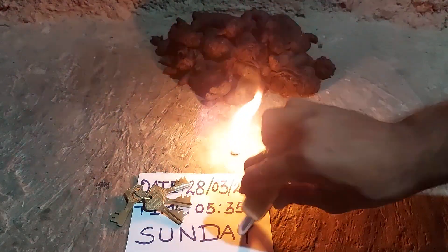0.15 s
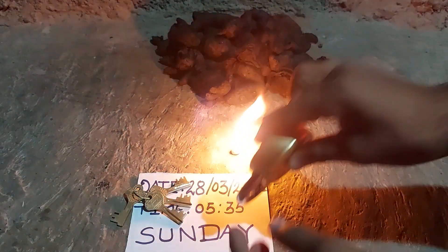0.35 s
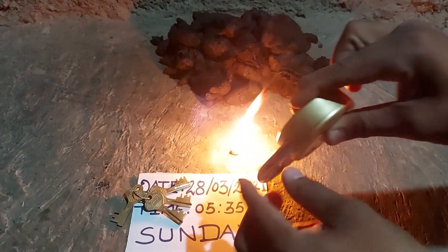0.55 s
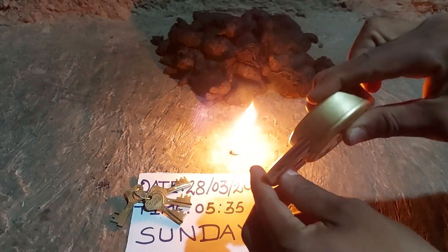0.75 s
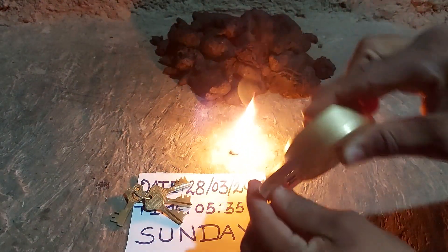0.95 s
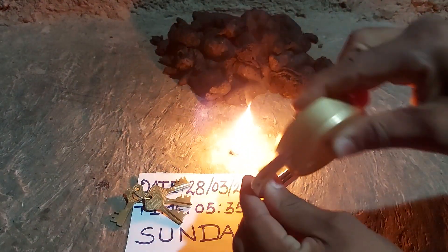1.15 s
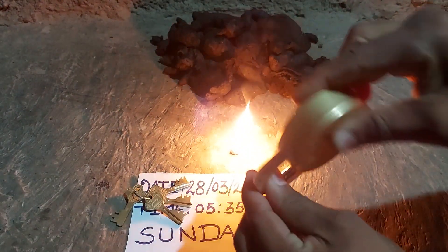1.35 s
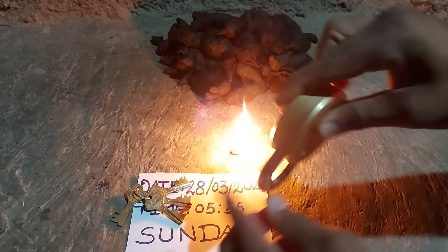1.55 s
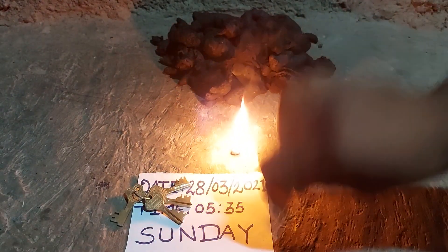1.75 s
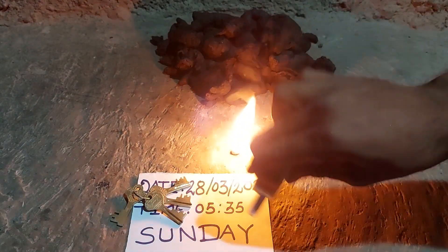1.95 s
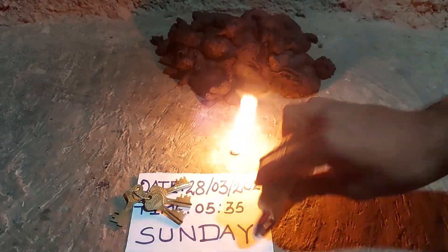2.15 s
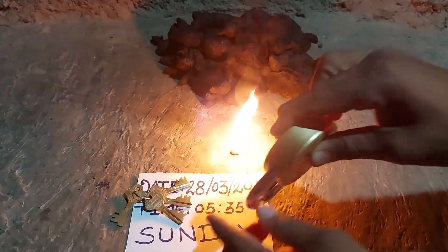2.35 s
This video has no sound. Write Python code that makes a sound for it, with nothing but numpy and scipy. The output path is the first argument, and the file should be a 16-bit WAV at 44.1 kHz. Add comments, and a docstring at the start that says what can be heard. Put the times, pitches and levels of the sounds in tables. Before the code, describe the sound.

Close recording of a padlock in hand: one loud clack with a short rattle, a quieter stretch of fine metallic ticks, then two loud clacks near the end, over faint low room rumble.

```python
"""A low room rumble and a brief scrape open the scene: a metal padlock handled above a hard floor in a small, dry room.
Three times it is knocked down with a sharp clack: a noise burst with a push of air, a rattle and decaying modes.
In between, its loose parts tick (band-balanced bursts), ping (decaying sines), scrape (slip trains through a
resonance) and slide (coloured noise). A thin sine lingers after the clacks. The left microphone is shaded
from the treble."""
import sys
import numpy as np
from scipy import signal
from scipy.fft import rfft, irfft, next_fast_len
from scipy.io import wavfile

SR = 44100
rng = np.random.default_rng(int(sys.argv[2]) if len(sys.argv) > 2 else 0)


def transcribe(u):
    """Save the signal u as a 16-bit wav file named by the first command-line argument.

    u: samples, shape (n,) or (channels, n), limited to [-1, 1]; the rate is SR.
    q: integer samples, one column per channel.
    """
    v = np.clip(np.atleast_2d(u).T, -1, 1)
    q = np.round(v * 32767).astype(np.int16)
    wavfile.write(sys.argv[1], SR, q)


N = 105840  # samples, 2.4 s
AGE = np.arange(SR // 4) / SR  # time since a contact, s

# Room rumble spectrum before normalisation: f/Hz, relative level/dB
RUMBLE_SPECTRUM = [(15, -49.5), (25, -18), (114, 1.5), (153, -9), (335, -12.5), (818, -27), (2610, -45),
                   (16000, -42)]
# Rumble swelling with the handling: t/s, gain/dB
RUMBLE_SWELL = [(0, 6.5), (0.401, 2.5), (.8, 0.5), (1.6, 4.5), (2.4, 5.5)]
# Spectrum of the sliding grip: f/Hz, relative level/dB
SLIDE_COLOUR = [(3300, -5.5), (4200, 6), (6800, -6), (8600, -2), (10000, -7.5)]
# Contacts that ring at one clear pitch: t/s, f/Hz, level/dB
PINGS = [(1.004, 4140, -38.5), (1.572, 977, -50), (1.649, 13300, -31), (2.007, 13750, -37.5)]
# Scrapes: t/s, length/s, relative slip level/dB, strongest resonance f/Hz, its relative level/dB
SCRAPES = [(0.001, 0.0042, -56.5, 3480, -62), (1.651, 0.0053, -54.5, 3180, -61),
           (1.77, 0.018, -51.5, 1620, -56.5), (2.058, 0.024, -57, 1750, -63.5),
           (2.064, 0.004, -52, 4790, -65)]
# Light ticks: t/s, then relative level/dB of the lows, the middle and the treble
TICKS = [(0.0852, -99, -53, -49), (0.0927, -100, -51, -49), (0.1548, -87, -53, -50.5),
         (0.1641, -60.5, -46.5, -47.5), (0.2394, -62, -40, -53), (0.29, -57.5, -53.5, -77),
         (0.3372, -72.5, -50.5, -51.5), (1.002, -58.5, -45.5, -43.5), (1.0933, -68, -56, -49),
         (1.0999, -56.5, -46.5, -50.5), (1.1127, -70, -50.5, -59.5), (1.2145, -65, -39, -43.5),
         (1.296, -58.5, -45.5, -52), (1.419, -62.5, -42, -45.5), (1.555, -77, -50.5, -57.5),
         (1.573, -68, -46.5, -55), (1.6471, -84, -48.5, -41), (1.7865, -76.5, -43.5, -39.5),
         (1.82, -54, -41.5, -41), (1.9428, -69, -45.5, -43), (2.008, -82, -58, -48.5),
         (2.05, -67, -53, -46), (2.218, -67, -49, -49.5), (2.2834, -86, -51.5, -50.5)]
# Spectrum of light contacts: f/Hz, relative level/dB
TICK_COLOUR = [(300, -17), (1000, 2), (2000, -1.5), (4000, 8), (8500, 6), (10000, -2.5), (13000, 4),
               (16000, -9)]
# Modes of the lock's metal parts: f/Hz, relative level/dB
METAL_MODES = [(2000, 1), (3110, -4), (3680, -1), (5850, 0.5), (6470, 0), (8760, 2), (10700, 3),
               (12000, -9.5)]
# Clacks: t/s, relative blow level/dB, thud gain/dB, treble gain/dB, lingering ring level/dB,
# body resonance f/Hz, its relative level/dB, hollow band f/Hz, relative bolt level/dB
CLACKS = [(0.21, 1, 1, -4.5, -79, 780, -24, 564.6, -17), (1.8405, 2.5, 3, -6, -94, 544, -29.5, 713, -32),
          (2.1198, 1.5, 3, -4.5, -77, 292, -28.5, 508, -14.5)]
# Spectrum of the crack: f/Hz, relative level/dB
CRACK_COLOUR = [(130, -24.5), (350, -3.5), (900, -6), (1800, -7), (2500, -10.5), (3500, -4), (4800, -1),
                (6800, -1), (7650, 1), (8500, -1), (10000, -5), (12500, 4.5), (16000, -2.5)]
# Answer of the floor and the air above it: f/Hz, relative level/dB, t60/s
THUD_MODES = [(90.6, -41.5, 0.32), (118, -33.5, 0.18), (181, -37.5, .17), (229, -37.5, 0.13),
              (275.5, -35.5, 0.1), (361.5, -25, 0.061), (440.5, -26.5, 0.055), (489, -37.5, .15),
              (720.4, -25.5, 0.037), (1466, -33, 0.035), (1752, -35, 0.15)]
# Shading of the left microphone: f/Hz, gain/dB
LEFT_SHADE = [(300, 0), (700, 2), (1300, 1), (2400, -2), (4400, -9), (6000, -16), (8200, -28), (11500, -16),
              (15000, -15)]

# Stereo: corner frequencies of the likeness between sides, and its greatest value
ALIKE_BELOW_HZ, RUMBLE_ALIKE_HZ, BASS_ALIKE = 1200, 457, 0.94
RUMBLE_DB = -64.5
ROOM_T60_S, ROOM_BUILD_S, TAIL_ROUGH_DB = 0.15, 0.0077, 3.2
SLIDE_S, SLIDE_PEAK_S, SLIDE_END_S, SLIDE_DB = 0.639, 0.664, 0.74, -67
PING_T60_S, PING_ROOM_DB = 0.028, -17
SLIPS_PER_S, SLIP_SPREAD_DB, SCRAPE_T60_S, SCRAPE_ROOM_DB, SCRAPE_Q = 520, 3, 0.042, -3, 7.9
TICK_DB, TICK_HOLD_S, TICK_T60_S, TICK_ROOM_DB = -1.5, 0.001, 0.015, -12
METAL_DB, METAL_T60_S, METAL_SPREAD_DB = -10.5, 0.03, 2.4
PUSH_DB, PUSH_S = -16, 0.00013
CRACK_DB, CRACK_HOLD_S, CRACK_T60_S, CRACK_ROUGH_DB = -9, 0.0018, 0.033, -3.5
REBOUND_S, REBOUND_DB, CLACK_ROOM_DB = 0.0015, 1, -5.5
RATTLES_PER_S, RATTLE_DB, RATTLE_T60_S = 490, -19, 0.1
RATTLE_RING_DB, RATTLE_RING_T60_S = -21.5, 0.039
BOLT_HZ, BOLT_T60_S, BODY_T60_S = 7620, 0.06, 0.029
THUD_RISE_CYCLES, THUD_SPREAD_RAD, THUD_DETUNE = 0.09, 0.54, 0.006
HOLLOW_DB, HOLLOW_WIDTH = -8.5, 1.18  # depth, and edge-to-centre frequency ratio
LINGER_HZ, LINGER_T60_S = 1670, 2.5
LOW_CUT_HZ, CUTOFF_HZ = 62, 16100


def from_db(db):
    """Level definition: amplitude ratio is ten to the power of dB / 20."""
    return 10 ** (np.asarray(db) / 20)


def fade(t60, hold=0, age=AGE):
    """Exponential damping: after the hold, the amplitude falls by 60 dB in each t60."""
    return from_db(-60 * np.maximum(age - hold, 0) / t60)


def sine(hz, age=AGE, phase=0):
    """Simple harmonic motion of unit amplitude."""
    return np.sin(2 * np.pi * hz * age + phase)


def add(track, s, sound):
    """Superposition: pressures add from the given time onward."""
    start = max(int(s * SR), 0)
    part = sound[..., :N - start]
    track[:, start:start + part.shape[-1]] += part


def colour(x, points):
    """Minimum-phase filtering: a causal response follows from the log magnitude through its cepstrum."""
    size = 2 * next_fast_len(x.shape[-1])
    hz, db = np.transpose(points)
    grid = np.maximum(np.fft.rfftfreq(size, 1 / SR), 1)
    gain_db = np.interp(np.log(grid), np.log(hz), db)
    cepstrum = irfft(np.log(from_db(gain_db)))
    # Fold negative time onto positive time
    cepstrum[1:size // 2] *= 2
    cepstrum[size // 2 + 1:] = 0
    response = np.exp(rfft(cepstrum))
    return irfft(rfft(x, size) * response)[..., :x.shape[-1]]


def stereo_noise(size, alike_hz):
    """Spatial coherence: white noise nearly alike on both sides in the bass, unrelated in the treble."""
    mid, side = rfft(rng.standard_normal((2, size)))
    alike = BASS_ALIKE / (1 + (np.fft.rfftfreq(size, 1 / SR) / alike_hz) ** 2)
    common = np.sqrt(1 + alike) * mid
    opposed = np.sqrt(1 - alike) * side * [[1], [-1]]
    return irfft(common + opposed, size) / np.sqrt(2)


def ragged(depth_db):
    """Random modulation: the gain wanders between new values every one or two milliseconds."""
    knots = AGE[::SR // 600]
    return from_db(depth_db * np.interp(AGE, knots, rng.standard_normal(len(knots))))


def rumble():
    """Background noise: random pressure with most of its power in the bass, scaled to an rms level."""
    noise = colour(stereo_noise(N + SR, RUMBLE_ALIKE_HZ), RUMBLE_SPECTRUM)[:, SR:]  # filter settled
    swell_db = np.interp(np.arange(N) / SR, *np.transpose(RUMBLE_SWELL))
    return from_db(RUMBLE_DB + swell_db) * noise / noise.std()


def reflections():
    """Diffuse reverberation: dense returns from the nearby walls build up, then decay exponentially."""
    build_up = 1 - np.exp(-(AGE / ROOM_BUILD_S) ** 2)
    returns = stereo_noise(len(AGE), ALIKE_BELOW_HZ) * ragged(TAIL_ROUGH_DB)
    return returns * fade(ROOM_T60_S) * build_up


def in_room(sound, room_db):
    """Linear room response: convolution with the wall returns follows the direct sound."""
    walls = reflections()
    answer = walls / np.linalg.norm(walls[0])
    return sound + from_db(room_db) * signal.fftconvolve(sound[None], answer)[:, :len(AGE)]


def slide():
    """Sliding friction: a faint rub as the fingers shift their grip, with power following pressure."""
    pressure = np.interp(np.arange(N) / SR, [SLIDE_S, SLIDE_PEAK_S, SLIDE_END_S], [0, 1, 0])
    rub = colour(stereo_noise(N, ALIKE_BELOW_HZ), SLIDE_COLOUR)
    return from_db(SLIDE_DB) * np.sqrt(pressure) * rub


def pings():
    """Free vibration: a loose part, once struck, rings on its own at one damped frequency."""
    out = np.zeros((2, N))
    for s, hz, db in PINGS:
        ring = from_db(db) * sine(hz) * fade(PING_T60_S)
        add(out, s, in_room(ring, PING_ROOM_DB))
    return out


def contacts(rate):
    """Random impacts: tiny collisions of either sign, uneven in strength, with unit standard deviation."""
    chance = rng.random(len(AGE))
    sign, strength = rng.standard_normal((2, len(AGE)))
    gain = from_db(SLIP_SPREAD_DB * np.clip(strength, -2, 2))
    clicks = (chance < rate / SR) * np.sign(sign) * gain
    return clicks / (clicks.std() + 1e-9)


def scrapes():
    """Stick-slip friction: metal dragged over metal gives a run of slips that excites one resonance."""
    out = np.zeros((2, N))
    high_pass = signal.butter(2, 2000, "high", fs=SR, output="sos")
    for s, length, db, hz, ring_db in SCRAPES:
        slips = contacts(SLIPS_PER_S) * fade(SCRAPE_T60_S, length)
        # Compensate for the narrow bandwidth of the resonance
        bandwidth_gain = np.sqrt(SCRAPE_Q * SR / (np.pi * hz))
        ring = signal.lfilter(*signal.iirpeak(hz, SCRAPE_Q, fs=SR), slips) * bandwidth_gain
        rasp = colour(signal.sosfilt(high_pass, slips), TICK_COLOUR)
        add(out, s, in_room(from_db(db) * rasp + from_db(ring_db) * ring, SCRAPE_ROOM_DB))
    return out


def metal_ring(t60):
    """Modal superposition: the metal parts ring, each mode with a new strength and phase at every contact."""
    ring = np.zeros(len(AGE))
    for hz, db in METAL_MODES:
        strength = from_db(db + rng.normal(0, METAL_SPREAD_DB))
        ring += strength * sine(hz, phase=rng.uniform(0, 2 * np.pi))
    return fade(t60) * ring


def chatter(hold, t60, room_db):
    """Rough contact: metal on metal gives a dense, short noise burst, followed by the room."""
    burst = stereo_noise(len(AGE), ALIKE_BELOW_HZ) * fade(t60, hold)
    return burst + from_db(room_db) * reflections()


def ticks():
    """Impact excitation: small contacts ring the metal briefly, each with its own balance of three bands."""
    out = np.zeros((2, N))
    edges_hz = ((850, 2200), (2500, 9000), (9800, 15000))
    bands = [signal.butter(3, edges, "band", fs=SR, output="sos") for edges in edges_hz]
    for s, *band_dbs in TICKS:
        metal = from_db(METAL_DB) * metal_ring(METAL_T60_S)
        source = colour(chatter(TICK_HOLD_S, TICK_T60_S, TICK_ROOM_DB) + metal, TICK_COLOUR)
        for sos, db in zip(bands, band_dbs):
            part = signal.sosfilt(sos, source)
            onset_level = part[:, :SR // 200].std(axis=1, keepdims=True)  # first 5 ms
            add(out, s, from_db(TICK_DB + db) * part / onset_level)
    return out


def rattle():
    """Repeated impact: after a blow the shackle and inner parts clatter and settle, each hit ringing the metal."""
    answer = (AGE == 0) + from_db(RATTLE_RING_DB) * metal_ring(RATTLE_RING_T60_S)
    hits = contacts(RATTLES_PER_S) * fade(RATTLE_T60_S)
    clatter = signal.fftconvolve(hits, answer / np.linalg.norm(answer))
    return from_db(RATTLE_DB) * clatter[:len(AGE)]


def air_push():
    """Displacement of air: a brief pressure swing of one sign, then a weaker one of the other."""
    x = AGE / PUSH_S
    return -from_db(PUSH_DB) * x * (1 - x / 4) * np.exp(1 - x)


def crack():
    """Impact and rebound: a rough noise burst struck twice in quick succession, with room and rattle."""
    first = fade(CRACK_T60_S, CRACK_HOLD_S)
    second = from_db(REBOUND_DB) * (AGE > REBOUND_S) * fade(CRACK_T60_S / 2, REBOUND_S)
    burst = stereo_noise(len(AGE), ALIKE_BELOW_HZ) * (first + second) * ragged(CRACK_ROUGH_DB)
    burst_in_room = burst + from_db(CLACK_ROOM_DB) * reflections()
    return colour(from_db(CRACK_DB) * burst_in_room + rattle(), CRACK_COLOUR)


def thud(body_hz, body_db):
    """Modal response: a blow sets the body, the floor and the air above it into damped vibration."""
    out = from_db(body_db) * -sine(body_hz) * fade(BODY_T60_S)
    for hz, db, t60 in THUD_MODES:
        cycles = hz * (1 + rng.normal(0, THUD_DETUNE)) * AGE
        # The two sides drift apart in phase as frequency rises
        side_phase = rng.normal(0, THUD_SPREAD_RAD, (2, 1)) * np.sqrt(2 * hz / ALIKE_BELOW_HZ)
        phase = rng.uniform(0, 2 * np.pi) + side_phase
        swing = sine(1, cycles, phase) * (1 - np.exp(-cycles / THUD_RISE_CYCLES))
        out = out + from_db(db) * swing * fade(t60)
    return out


def clacks():
    """Composite impact: push of air, crack, bolt ring and thud, with a hollow band and a lingering ring."""
    out, long_age = np.zeros((2, N)), np.arange(N) / SR
    for s, db, thud_db, treble_db, linger_db, body_hz, body_db, hollow_hz, bolt_db in CLACKS:
        bolt = from_db(bolt_db) * sine(BOLT_HZ) * fade(BOLT_T60_S)
        sharp = colour(air_push() + crack() + bolt, [(2000, 0.031), (6000, treble_db)])
        blow = from_db(db) * sharp + from_db(thud_db) * thud(body_hz, body_db)
        hollow = [(hollow_hz / HOLLOW_WIDTH, 0), (hollow_hz, HOLLOW_DB), (hollow_hz * HOLLOW_WIDTH, 0)]
        add(out, s, colour(blow, hollow))
        linger = sine(LINGER_HZ, long_age) * fade(LINGER_T60_S, age=long_age)
        add(out, s, from_db(linger_db) * linger)
    return signal.sosfilt(signal.butter(3, LOW_CUT_HZ, "high", fs=SR, output="sos"), out)


def scene():
    """Shading: the lock is close to the right microphone and reaches the left one dulled."""
    left, right = slide() + pings() + scrapes() + ticks() + clacks()
    return rumble() + np.array([colour(left, LEFT_SHADE), right])


def record(dry):
    """Saturation and band limiting: peaks are rounded and the top is cut."""
    low_pass = signal.ellip(12, 0.1, 80, CUTOFF_HZ, fs=SR, output="sos")
    return signal.sosfilt(low_pass, np.tanh(dry))


dry = scene()
out = record(dry)
transcribe(out)
```